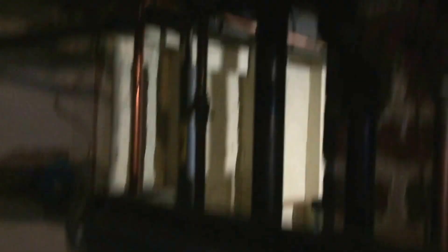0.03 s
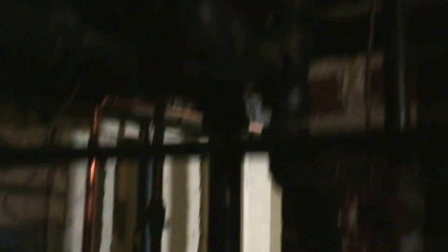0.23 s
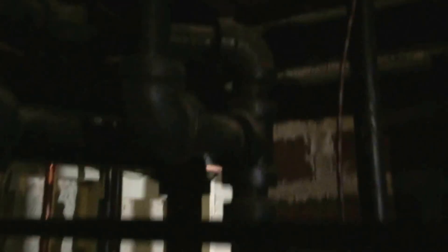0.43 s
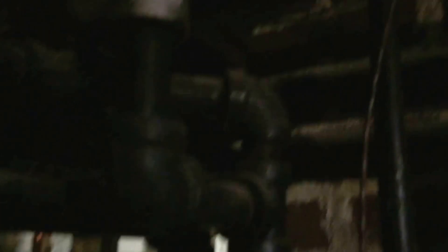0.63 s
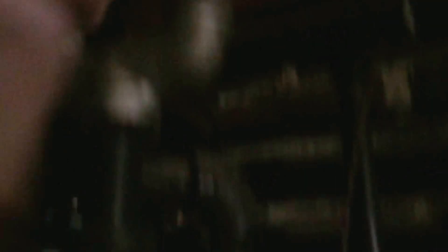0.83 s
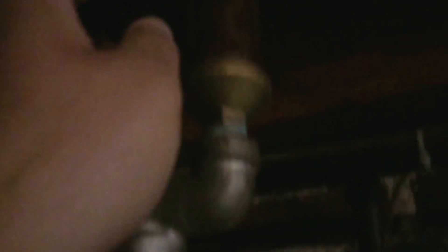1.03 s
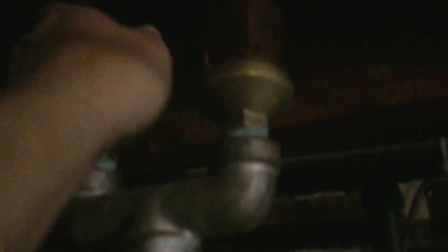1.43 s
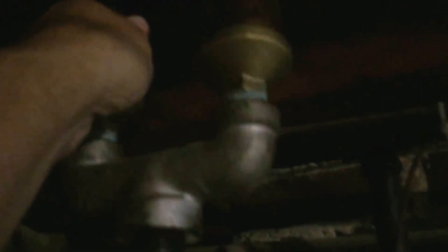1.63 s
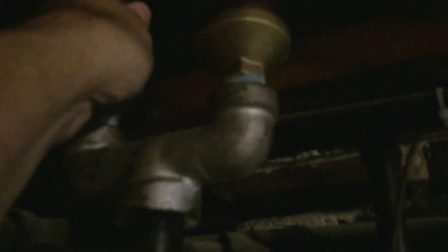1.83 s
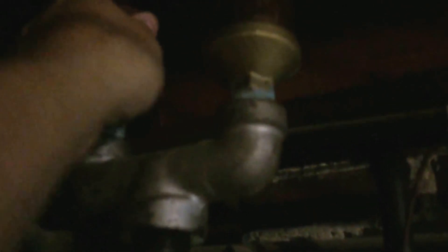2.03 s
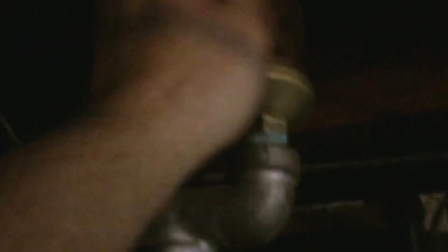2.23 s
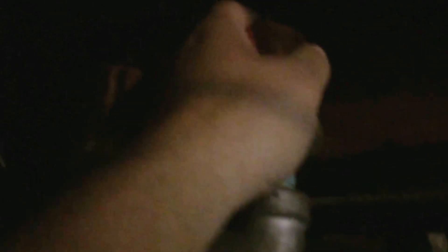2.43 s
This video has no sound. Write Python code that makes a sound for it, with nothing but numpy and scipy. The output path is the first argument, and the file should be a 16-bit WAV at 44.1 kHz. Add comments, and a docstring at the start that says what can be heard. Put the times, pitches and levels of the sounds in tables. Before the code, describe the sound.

A sharp, ringing clank on metal pipe fittings follows heavy thuds in a quiet basement.

```python
"""The boom of a heavy thud dies away in a quiet basement, over steady room air and a motor's whine.
After a faint squeak the heavy object thuds again and rattles, and the room's low modes boom on.
A hand scrapes, bumps and brushes along the pipework; a small metal fitting snaps home with one sharp,
ringing clank, and the room answers. A scrape, faint rubs on metal and a last tick follow. One mono
microphone in the room; air and whine are quieter around the thuds and return as its gain recovers."""
import sys
import numpy as np
from scipy import signal
from scipy.fft import rfft, irfft, next_fast_len
from scipy.io import wavfile

SR = 44100
rng = np.random.default_rng(int(sys.argv[2]) if len(sys.argv) > 2 else 0)


def store_pcm(level_fs):
    """Save levels as 16-bit WAV."""
    pcm = np.round(np.clip(level_fs, -1, 1) * 32767).astype(np.int16)
    wavfile.write(sys.argv[1], SR, np.atleast_2d(pcm).T)


N = 110250
T = np.arange(N) / SR

# heavy thuds, the first already dying away (time [s], gain [dB])
THUDS = [(-.2, -4), (.2, 1)]
# the basement's low modes (frequency [Hz], level [dB], t60 [s])
BOOM_MODES = [(78.4, -26, 0.81), (122.3, -23.5, 0.69), (155.7, -19.5, 0.36)]
# its diffuse boom (frequency [Hz], relative level [dB])
BOOM_SPECTRUM = [(28, -43), (55, -10.5), (80, 3.5), (160, -1.5), (330, -14.5), (600, -59.5)]
# resonances of the heavy object's body (frequency [Hz], width [Hz], relative level [dB])
BODY_PEAKS = [(330, 50, -8), (455, 26, -1), (665, 40, 1), (775, 24, -3), (856, 24, -4), (1010, 42, 0),
              (1125, 45, -1), (1315, 75, 0), (1640, 150, -8), (1965, 70, -4), (2480, 100, -13),
              (3040, 160, -8), (3650, 140, -16)]
# the noise that drives them (frequency [Hz], relative level [dB])
BODY_DRIVE = [(100, -26), (280, -2.5), (3700, -4), (10000, -8.5), (15000, -28)]
# the body's decay (frequency [Hz], t60 [s])
BODY_T60 = [(300, 0.63), (1300, 0.47), (3200, 0.41), (8000, 0.32)]
# the slap of the impact (frequency [Hz], relative level [dB])
SLAP_SPECTRUM = [(300, -24), (1500, 2), (3200, 2.5), (3900, -6), (4700, -19.5), (14000, -37)]
# room tone (frequency [Hz], relative level [dB])
AIR_SPECTRUM = [(25, -27), (55, -2.5), (90, -1.5), (150, -7), (270, -18), (365, -10.5), (540, -15.5),
                (900, -12.5), (1400, -21), (3800, -25), (4700, -30), (6200, -27), (10000, -37),
                (15000, -39.5)]
# the recorder's gain on the room tone, recovering after the thuds (time [s], gain [dB])
AIR_GAIN_RECOVERY = [(0, -1), (.55, 0), (1.0, 0)]
# the motor's harmonics (multiple of its speed [1], level [dB])
MOTOR_HARMONICS = [(8, -55.5), (9, -68), (11, -70), (12, -70)]
# the recorder's gain on the whine, recovering after the thuds (time [s], gain [dB])
WHINE_GAIN_RECOVERY = [(0, -17), (.5, -7.5), (1.0, 0)]
# the squeak's resonance (frequency [Hz], width [Hz], relative level [dB])
SQUEAK_PEAKS = [(3120, 77, 0)]
# knocks of the object rattling to rest (time [s], level [dB])
RATTLES = [(0.2196, -27), (0.2337, -22.5), (.252, -26), (.266, -27)]
# dry scrapes of the hand (time [s], width [s], level [dB])
SCRAPES = [(0.628, 0.018, -65.5), (.8, 0.15, -61.5), (1.89, 0.053, -53), (2.2, 0.26, -66.5)]
# resonances under the scraping hand (frequency [Hz], width [Hz], relative level [dB])
SCRAPE_PEAKS = [(890, 230, -0.5), (1420, 170, 1.5), (1854, 170, 0.5), (2460, 570, -5.5), (3700, 700, -9)]
# soft bumps on the pipework (time [s], pitch [Hz], level [dB], room boom level [dB])
BUMPS = [(0.889, 198, -37.5, -45.5), (0.921, 410, -35.5, -53), (0.93, 181, -34, -51.5),
         (1.082, 227, -37.5, -42.5), (1.56, 147, -47, -43.5), (1.89, 176, -42.5, -49.5),
         (2.387, 206, -44.5, -54)]
# the hand brushing the pipe (frequency [Hz], relative level [dB])
BRUSH_SPECTRUM = [(200, -2), (450, -2.5), (1600, -5), (3000, -7.5), (15000, -26)]
# fingers rubbing on metal (time [s], width [s], level [dB], tilt [dB/octave])
RUBS = [(1.263, 0.016, -70, 10), (2.068, 0.027, -64, 1), (2.365, 0.021, -67, 5)]
# the fitting's main modes (frequency [Hz], level [dB], t60 [s])
FITTING_MODES = [(2153, -41, .27), (2560, -39, .16), (2813, -42, .28), (3642, -32, .35),
                 (3752, -22.5, .115), (3725, -44, .47), (4226, -38, .11), (4446, -16, .09),
                 (4680, -20, .086), (5798, -35, .21), (6131, -47, .66), (7217, -21, .12), (7374, -28, .13),
                 (7472, -21, .07), (8400, -40, .17), (8995, -37, .125), (9609, -38, .11),
                 (12730, -28, .065), (13950, -32, .1)]
# the metal snaps home and chatters once (delay [s], level [dB])
CONTACTS = [(0, -23.5), (.0033, -27)]
# the snap of those contacts (frequency [Hz], relative level [dB])
SNAP_SPECTRUM = [(900, -29), (1650, -1), (5800, 4.5), (14000, -7)]
# colour of the fitting's crack and minor modes (frequency [Hz], relative level [dB])
CRACK_SPECTRUM = [(700, -25.5), (1700, -12), (3200, -10), (4500, 1), (5200, -8), (7400, -0.5), (8050, -26),
                  (8600, -5), (9900, -6), (10500, -28), (11300, -13), (15000, -16)]
# decay of the basement's reverberation (frequency [Hz], t60 [s])
ROOM_T60 = [(1000, 0.49), (4000, 0.43), (8000, .28), (14000, 0.24)]
# colour of its answer to the clank (frequency [Hz], gain [dB])
ROOM_COLOUR = [(1000, 12), (1900, -0.5), (2700, 4.5), (4300, -1), (5100, -6), (14000, -5.5)]
# the last tick (frequency [Hz], relative level [dB])
TICK_SPECTRUM = [(2000, -13), (5000, -8), (9200, 2.5), (15000, -18)]


def amp(db):
    """Decibels to gain."""
    return 10 ** (np.asarray(db) / 20)


def unit(x):
    """Scale to rms 1."""
    return x / np.sqrt(np.mean(x ** 2) + 1e-20)


def along(points, hz):
    """Read (frequency, value) points on a log frequency axis."""
    freqs, values = np.transpose(points)
    return np.interp(np.log(hz + 1), np.log(freqs + 1), values)


def filtered(x, response):
    """Pass x through a gain that depends on frequency."""
    size = next_fast_len(N + 8192)
    return irfft(rfft(x, size) * response(np.fft.rfftfreq(size, 1 / SR)), size)[:N]


def noise(spectrum):
    """Coloured noise of rms 1."""
    return unit(filtered(rng.standard_normal(N), lambda hz: amp(along(spectrum, hz))))


def resonate(x, peaks):
    """Pass x through resonances that add in power; the result has rms 1."""
    def response(f):
        bands = (amp(db) * f * width / (hz * hz - f * f + 1j * f * width) for hz, width, db in peaks)
        return np.sqrt(sum(np.abs(band) ** 2 for band in bands))
    return unit(filtered(x, response))


def envelope(s, rise, t60, hold=0):
    """A linear rise from time s and an exponential decay from s + hold, all in seconds."""
    return np.clip((T - s) / rise, 0, 1) * amp(-60 * np.maximum(T - s - hold, 0) / t60)


def swell(s, width):
    """A bell curve centred on time s."""
    return np.exp(-.5 * ((T - s) / width) ** 2)


def dying(x, s, t60s):
    """From time s on, each frequency of x dies at its own speed."""
    hz, t, spectra = signal.stft(x, SR, nperseg=256)
    decay = amp(-60 * np.maximum(t - s, 0) / along(t60s, hz)[:, None])
    return signal.istft(spectra * decay, SR)[1][:N]


def ring(s, modes, rise):
    """Damped modes struck at time s, each at a random phase."""
    return sum(amp(db) * envelope(s, rise, t60) * np.sin(2 * np.pi * (hz * (T - s) + rng.random()))
               for hz, db, t60 in modes)


def thuds(push_hz=156):
    """Each impact gives a low push and a slap and rings the object's body; the room booms on."""
    out = np.zeros(N)
    for s, db in THUDS:
        t = T - s - .0058  # the push is centred just after the contact
        push_shape = np.exp(-np.abs(t) / np.where(t < 0, .0056, .0041))
        push = amp(-6) * push_shape * np.sin(-2 * np.pi * push_hz * t)
        boom = ring(s, BOOM_MODES, rise=.023)
        boom += amp(-21.5) * noise(BOOM_SPECTRUM) * envelope(s, rise=.0083, t60=.57)
        body = dying(resonate(noise(BODY_DRIVE), BODY_PEAKS), s + .05, BODY_T60)
        body_onset = .5 + .5 * np.tanh((T - s - .004) / .015)
        slap = amp(-25.5) * noise(SLAP_SPECTRUM) * envelope(s, rise=.0018, t60=.13)
        out += amp(db) * (push + boom + amp(-24.5) * body * body_onset + slap)
    return out


def room_tone():
    """The basement's steady air: a soft, low rush, slightly quieter until the gain recovers."""
    return amp(-58 + np.interp(T, *np.transpose(AIR_GAIN_RECOVERY))) * noise(AIR_SPECTRUM)


def motor(speed_hz=78.68):
    """A steady motor whines at harmonics of its speed, quieter until the recorder's gain recovers."""
    whine = sum(amp(db) * np.sqrt(2) * np.sin(2 * np.pi * (k * speed_hz * T + rng.random()))
                for k, db in MOTOR_HARMONICS)
    return amp(np.interp(T, *np.transpose(WHINE_GAIN_RECOVERY))) * whine


def squeak():
    """A faint, narrow band of noise swells just before the second thud."""
    return amp(-63.5) * resonate(rng.standard_normal(N), SQUEAK_PEAKS) * swell(.14, width=.031)


def rattle():
    """After the thud the object knocks a few times, each time ringing its body."""
    return sum(amp(db) * resonate(noise(BODY_DRIVE), BODY_PEAKS) * envelope(s, rise=.001, t60=.044)
               for s, db in RATTLES)


def slips(per_second=2000):
    """Friction: tiny stick-slip impulses of random time, sign and size."""
    slipping = rng.random(N) < per_second / SR
    return unit(slipping * rng.choice([-1, 1], N) * (.5 + rng.random(N)))


def scrapes(cutoff_hz=4130):
    """The hand sticks and slips along the fitting, rasping through broad resonances."""
    rasp = filtered(slips(), lambda hz: 1 / np.hypot(1, (hz / cutoff_hz) ** 4))
    strokes = sum(amp(db) * swell(s, width) for s, width, db in SCRAPES)
    return resonate(rasp, SCRAPE_PEAKS) * strokes


def bumps(width_cycles=.6):
    """Each soft contact with the pipework is one dull push, then a low boom from the room."""
    out = np.zeros(N)
    for s, hz, db, boom_db in BUMPS:
        out += amp(db) * swell(s, width_cycles / hz) * np.cos(2 * np.pi * hz * (T - s))
        out += amp(boom_db) * noise(BOOM_SPECTRUM) * envelope(s, rise=.01, hold=.016, t60=.63)
    return out


def brush():
    """The hand brushes the pipe once: a short, dull hiss of friction."""
    return amp(-44.5) * noise(BRUSH_SPECTRUM) * envelope(.909, rise=.02, hold=.03, t60=.2)


def rubs(above_hz=7400, damped_width_hz=130):
    """Brief scratches of the fingers excite the fitting's high modes, damped by the touch."""
    out = np.zeros(N)
    for s, width, db, tilt in RUBS:
        peaks = [(hz, damped_width_hz, tilt * np.log2(hz / above_hz))
                 for hz, _, _ in FITTING_MODES if hz > above_hz]
        friction = rng.standard_normal(N) + .5 * slips()
        out += amp(db) * swell(s, width) * resonate(friction, peaks)
    return out


def clank(s=1.5454):
    """Metal on metal: a double snap, a crack, the fitting's main and minor modes, and the room."""
    contacts = sum(amp(db) * envelope(s + delay, rise=.0001, t60=.01) for delay, db in CONTACTS)
    snap = noise(SNAP_SPECTRUM) * contacts
    crack = amp(-25.5) * noise(CRACK_SPECTRUM) * envelope(s, rise=.0001, hold=.0043, t60=.04)
    minor_hz = 1400 + 125 * (np.arange(110) + rng.random(110))  # one mode in each 125 Hz band
    minor_modes = [(hz, -44.5 + along(CRACK_SPECTRUM, hz), .078) for hz in minor_hz]
    clatter = crack + ring(s, minor_modes, rise=.0002)
    return snap + ring(s, FITTING_MODES, rise=.00089) + clatter + reverberation(clatter)


def reverberation(direct):
    """What the basement sends back to the microphone: a diffuse tail whose treble dies first."""
    tail = dying(rng.standard_normal(N), 0, ROOM_T60)
    reflected = signal.fftconvolve(direct, tail / np.linalg.norm(tail))[:N]
    return amp(-3.5) * filtered(reflected, lambda hz: amp(along(ROOM_COLOUR, hz)))


def tick():
    """One last dry tick: a tiny burst of bright noise."""
    return amp(-43) * noise(TICK_SPECTRUM) * envelope(2.377, rise=.00039, t60=.015)


def scene():
    """The basement as heard from one microphone position."""
    basement = thuds() + room_tone() + motor() + squeak() + rattle()
    pipework = scrapes() + bumps() + brush() + rubs() + clank() + tick()
    return (basement + pipework)[None]


def record(dry):
    """The camera's microphone channel keeps nothing above its band limit."""
    limit_hz = 15400
    return filtered(dry[0], lambda hz: hz < limit_hz)[None]


dry = scene()
out = record(dry)
store_pcm(out)
```